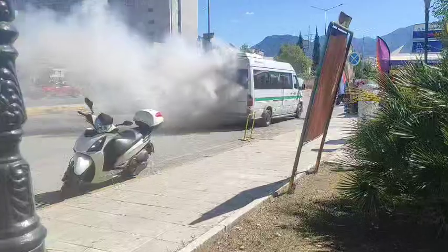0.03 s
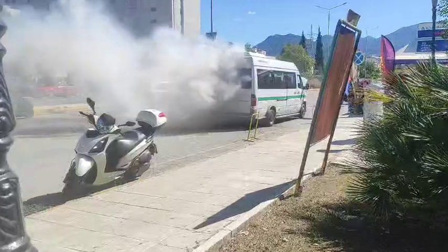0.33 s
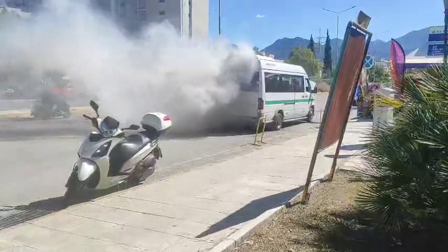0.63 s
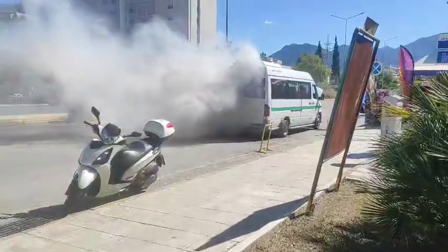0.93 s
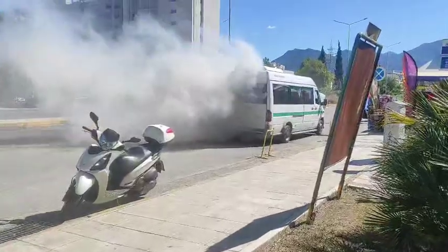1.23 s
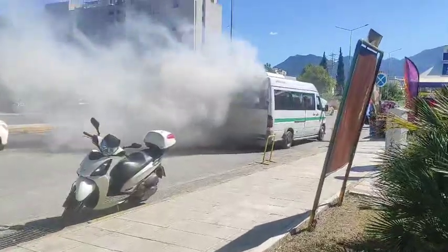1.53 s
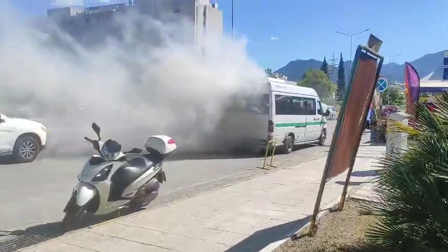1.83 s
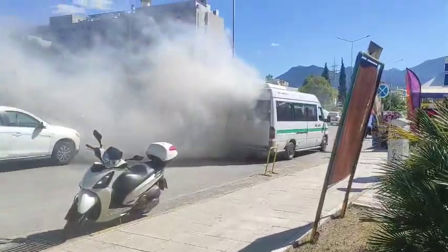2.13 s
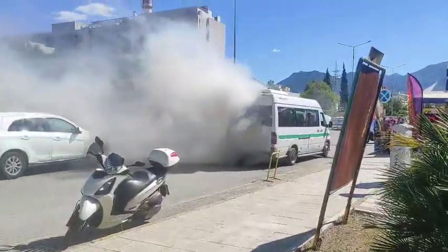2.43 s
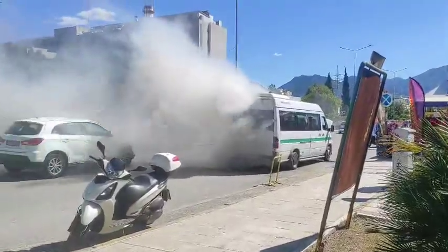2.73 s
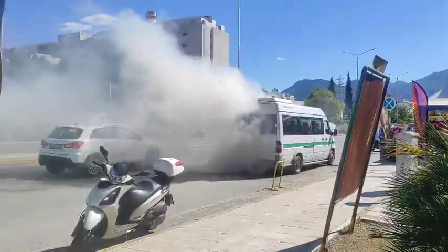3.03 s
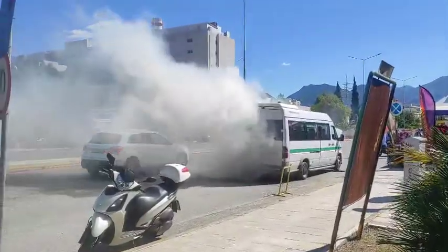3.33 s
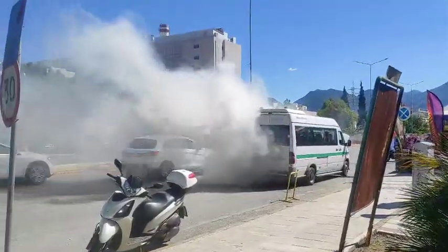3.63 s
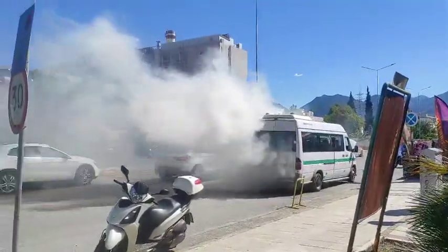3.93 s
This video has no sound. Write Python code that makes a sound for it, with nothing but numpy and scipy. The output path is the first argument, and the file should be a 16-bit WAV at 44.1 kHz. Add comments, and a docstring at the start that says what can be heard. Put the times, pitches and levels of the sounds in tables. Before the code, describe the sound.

Heard from the side of a street, a loud minibus engine races steadily, its exhaust throbbing under rattling metal, hiss and a thin whistle. Later it slows a little while a car rolls past in the background.

```python
"""At the kerb, a pair of microphones on a four-cylinder minibus engine, held at high revs and sagging
slowly. Its uneven firings throb in the exhaust and ring the engine block, with metallic squeals on
every cycle that merge into a thin whistle; the valve gear clatters and gas hisses in time with them.
Behind the engine, rumble and tyre noise swell as a car goes by."""
import sys
import numpy as np
from scipy import signal
from scipy.fft import rfft, irfft
from scipy.io import wavfile
from scipy.ndimage import map_coordinates

SR = 44100
rng = np.random.default_rng(int(sys.argv[2]) if len(sys.argv) > 2 else 0)


def digitize_waveform(pressure):
    """Quantize a signal to 16-bit integers and store it at the path in sys.argv[1].

    Rows of a 2-D input are taken as channels; values are limited to [-1, 1].
    """
    field = np.atleast_2d(pressure).T
    bounded = np.clip(field, -1, 1)
    quanta = np.round(bounded * 32767).astype(np.int16)
    wavfile.write(sys.argv[1], SR, quanta)


N = 176400
T = np.arange(N) / SR
HZ = np.maximum(np.arange(N // 2 + 1) * SR / N, 1e-3)

# Each row: frequency in Hz, share of the sound that reaches both microphones alike from 0 to 1.
MIC_LIKENESS = [(60, 0.98), (300, 0.89), (1000, 0.6), (1600, 0.83), (2400, 1), (4500, 0.2), (9000, 0)]
# Spectra at the microphones. Each row: frequency in Hz, left and right level in relative dB.
DEEP_SPECTRUM = [(12, -37, -17), (36.3, 2.5, -10), (60, -7, -5.5), (115, -3.5, -17.5)]
UPPER_SPECTRUM = [(94, -3.5, -30), (152.5, 4, 0.5), (275, 1, -3.5), (366, -12.5, -23), (574, -19, -13)]
TYRE_SPECTRUM = [(302, 5, 2), (445, 1.5, 2), (636, 5, -1), (810, 0.5, -7), (1500, -10, -24),
                 (3500, -26, -31), (5000, -12, -18), (6200, -10, -20)]
EXHAUST_SPECTRUM = [(25, -12, -13), (50, -5, -25), (118, 6, 2.5), (207, -4, -3), (296, 2, 0),
                    (410, -26, -26.5), (663, -1.5, 2.5)]
HISS_SPECTRUM = [(5380, -43, -33.5), (6810, -65, -10.5), (6640, -20, -13), (7320, -18.5, -11),
                 (7900, -15, -24), (8500, -12, -30), (9140, -12, -22.5), (9746, -24.5, -38),
                 (10100, -67, -53.5), (12100, -44, -41), (14600, -50, -51)]
CLATTER_SPECTRUM = [(355, -12, -17), (584, -13.5, -17), (770, -17, -22), (1180, -12.5, -11.5),
                    (1354, -12.5, -20.5), (1498, -6.5, 0.5), (1676, -5.5, -30), (1730, -16.5, -9.5),
                    (2040, -10.5, -13.5), (2370, -12.5, -15), (2650, -15, -8), (2736, -17.5, -22),
                    (3103, -19, -13), (3330, -60, -23), (3340, -16, -11.5), (4434, -20.5, -19),
                    (4170, -27.5, -28), (6000, -23, -19.5)]
# The street's swell. Each row: time in seconds, gain of the deep and of the upper rumble in dB.
RUMBLE_GAINS = [(.4, -3.5, -4.5), (.9, -5.5, -3), (1.25, -6.5, -0.5), (1.7, -2, -6.5), (2.05, -5, -3.5),
                (2.35, 1.5, -4.5), (2.55, -2.6, -8.5), (2.75, -2, 0.5), (2.9, -3.5, -3.5), (3.12, 4.5, 3.5),
                (3.25, 2, -1.5), (3.35, 4.5, 1), (3.55, 1, -0.5), (3.9, 0, -1)]
# The car drawing near. Each row: time in seconds, tyre level in dB.
TYRE_LEVELS = [(0, -59), (1.3, -49), (2.4, -42), (3.3, -42.5), (4, -40)]
# The sagging revs. Each row: time in seconds, engine cycles per second (four firings each).
ENGINE_SPEED = [(0.2, 27.62), (0.7, 27.48), (1.05, 27.49), (1.35, 27.52), (1.8, 27.35), (2.3, 27.18),
                (2.8, 26.83), (3.3, 26.47), (3.9, 25.97)]
# The uneven firings. Each row: one cylinder's place in the cycle from 0 to 1, then its strength in
# relative dB for exhaust, knock, lower ring, clatter, hiss, ping and clank.
CYLINDERS = [(0.061, -1.5, -9, 5, 8.5, 21, 4, -41), (0.319, 1, -5.5, -41, -0.5, 22, -11, 1.5),
             (0.552, -1, -42, 1, 5, 25.5, -1, 4), (0.661, -13, 0, -38, -0.5, -11, -26, -4.5)]
# The engine's shifting balance. Each row: time in seconds, gain of knock, clatter and hiss in dB.
ENGINE_GAINS = [(0.4, -4.5, 3, 0.3), (0.85, 1.5, 2, 3), (1.3, 6, 2.5, 0), (1.6, 3, 0.8, 0.7),
                (2.0, -2, 0.3, -0.5), (2.35, -3, 1, 1), (2.7, -3, -0.6, -2.5), (3.1, -10, 0.1, 0.1),
                (3.45, -9, 1.4, -1.9), (3.85, -6, 2.5, 0.4)]
# The block's resonances. Each row: frequency in Hz, width in Hz, level in relative dB.
LOWER_RING_MODES = [(602, 24, -15.5), (957, 32, 0), (1175, 35, -12), (1320, 22, -10)]
KNOCK_MODES = [(1430, 28, -2), (1597, 26, 0), (1720, 80, -6), (1812, 30, -5)]
CLANK_MODES = [(2000, 52, 0.34), (2236, 20, -2.4)]
PING_MODES = [(2635, 40, 0), (2747, 24, -4), (3140, 70, -2), (3460, 44, -8)]
# The block's lower ring. Each row: time in seconds, level in dB.
LOWER_RING_LEVELS = [(.25, -41.5), (.6, -38), (1.0, -40.5), (1.4, -38.5), (1.8, -37), (2.3, -40.5),
                     (2.7, -47.5), (3.1, -42), (3.5, -41.5), (3.9, -43.5)]
# The block's upper rings. Each row: time in seconds, gain of the ping and of the clank in dB.
UPPER_RING_GAINS = [(.4, -5.5, -10), (.9, 1.5, -10), (1.3, -12, -6), (1.8, -4, 3), (2.3, -2.5, -8),
                    (2.8, -10, -5), (3.3, -8, 6.5), (3.85, -7, -4)]
# Whistling overtones. Each row: multiple of the cycle rate, loudest place in the cycle from 0 to 1.
WHISTLES = [(58, .75), (60, .75)]
# One whistle gives way to the other. Each row: time in seconds, level of each whistle in dB.
WHISTLE_LEVELS = [(.3, -45, -60), (.75, -40.5, -60), (1.3, -38.5, -60), (1.8, -39, -60), (2.3, -37, -56),
                  (2.7, -39, -52), (3.0, -43, -47), (3.3, -52, -46), (3.85, -52, -44)]
# Once-a-cycle squeals. Each row: place in the cycle from 0 to 1, pitch at the peak in Hz,
# glide at full depth in Hz per second, half length in seconds.
SQUEALS = [(.75, 1565, -16000, .0045), (.13, 2680, 16000, .0026), (.64, 2660, 18000, .0026),
           (.15, 3450, 0, .004), (.37, 2060, -15000, .002), (.69, 2130, 0, .002), (.57, 1670, 0, .0025)]
# The squeals' balance. Each row: time in seconds, level of each squeal in dB.
SQUEAL_LEVELS = [(.35, -39.5, -50, -48, -43, -56, -56, -53), (.6, -38.5, -46, -46, -48, -56, -54, -51),
                 (.9, -38, -42.5, -42, -60, -54, -52, -48), (1.3, -38, -46, -50, -60, -54, -48, -47),
                 (1.8, -38.5, -54, -56, -53, -47, -47, -46), (2.35, -42.5, -55, -47, -54, -42.5, -44, -43),
                 (2.85, -45, -55, -45, -56, -44, -43, -46), (3.3, -47, -56, -48, -58, -48, -41.5, -50),
                 (3.85, -46, -58, -54, -58, -48, -44, -53)]
# The glides flatten as the revs sag. Each row: time in seconds, depth from 0 to 1.
GLIDE_DEPTH = [(1.2, .85), (1.9, .65), (2.5, .35)]

DEEP_DB, UPPER_DB, HISS_DB, CLATTER_DB = -37, -36, -35.5, -32.5  # before the gain tables
KNOCK_DB, PING_DB, CLANK_DB = -42, -43.5, -53  # likewise
EXHAUST_DB, FIRING_TONE_DB = -43.5, -46
TIMING_JITTER_S, STRENGTH_JITTER_DB, SQUEAL_SCATTER_DB = .00003, 1.9, 1.4
RIGHT_MIC_LAG_S = .00009


def undb(db):
    return 10 ** (np.asarray(db) / 20)


def level(x, db=0):
    return x * undb(db) / np.sqrt(np.mean(x ** 2))


def curve(table, column=1):
    """One column of a time table at every sample."""
    table = np.array(table)
    return np.interp(T, table[:, 0], table[:, column])


def pan(x, left_db):
    """Places a sound so that it is left_db louder at the left microphone."""
    return x * undb(np.array([[left_db], [-left_db]]) / 2)


def colour(pair, spectrum):
    """Mixes two unrelated signals into left and right and gives each its spectrum, with steep skirts."""
    spectrum, likeness = np.array(spectrum), np.array(MIC_LIKENESS)
    alike = np.clip(np.interp(np.log(HZ), np.log(likeness[:, 0]), likeness[:, 1]), 0, 1)
    mid, side = rfft(pair[0]) * np.sqrt(1 + alike), rfft(pair[1]) * np.sqrt(1 - alike)
    skirts = 1 / np.sqrt((1 + (spectrum[0, 0] / HZ) ** 8) * (1 + (HZ / spectrum[-1, 0]) ** 16))
    gains = [undb(np.interp(np.log(HZ), np.log(spectrum[:, 0]), spectrum[:, c])) * skirts for c in (1, 2)]
    return level(irfft(np.array([mid + side, mid - side]) * gains, N))


def rumble():
    """Low turbulent noise of exhaust flow and traffic, behind everything else."""
    deep = colour(rng.standard_normal((2, N)), DEEP_SPECTRUM)
    upper = colour(rng.standard_normal((2, N)), UPPER_SPECTRUM)
    deep *= undb(DEEP_DB + curve(RUMBLE_GAINS, column=1))
    upper *= undb(UPPER_DB + curve(RUMBLE_GAINS, column=2))
    return deep + upper


def tyres():
    """Road noise of a car drawing alongside the microphones."""
    return colour(rng.standard_normal((2, N)), TYRE_SPECTRUM) * undb(curve(TYRE_LEVELS))


def firings(cycle, column, jitter_s=TIMING_JITTER_S):
    """One pulse per cylinder and cycle, each a little different in time and strength."""
    pulses, turns = np.zeros(N + 2), np.arange(int(cycle[-1]) + 1)
    for cylinder in CYLINDERS:
        chance = rng.standard_normal((200, 2))[:len(turns)]
        due = turns + cylinder[0]
        at = np.clip((np.interp(due, cycle, T) + jitter_s * chance[:, 0]) * SR, 0, N)
        strength = undb(cylinder[column] + STRENGTH_JITTER_DB * chance[:, 1]) * (due < cycle[-1])
        np.add.at(pulses, at.astype(int), strength * (1 - at % 1))  # shared between two samples
        np.add.at(pulses, at.astype(int) + 1, strength * (at % 1))
    return pulses[:N]


def bursts(pulses, decay_s, steady):
    """An envelope that jumps at each pulse and dies away over a steady part."""
    pole = np.exp(-1 / (SR * decay_s))
    tails = level(signal.lfilter([1], [1, -pole], pulses))
    return np.sqrt(tails ** 2 + steady ** 2)


def rattle(cycle, repeat):
    """Two channels of noise like dense tiny impacts; the share `repeat` comes back on every cycle."""
    points = 1600
    patterns, fresh = rng.standard_normal((2, points)), rng.standard_normal((2, N))
    locked = np.array([map_coordinates(p, [cycle % 1 * points], mode="grid-wrap") for p in patterns])
    return np.sqrt(repeat) * locked + np.sqrt(1 - repeat) * fresh


def exhaust(cycle):
    """Rough puffs from the pipe over a tone at the firing rate."""
    puffs = rattle(cycle, repeat=0.34) * bursts(firings(cycle, column=1), decay_s=0.00083, steady=0.95)
    tone = level(np.sin(2 * np.pi * len(CYLINDERS) * cycle), FIRING_TONE_DB)
    return colour(puffs, EXHAUST_SPECTRUM) * undb(EXHAUST_DB) + pan(tone, left_db=4)


def hiss(cycle):
    """Sharp spits of gas in time with the firings."""
    gas = rattle(cycle, repeat=0.22)
    spits = bursts(firings(cycle, column=5, jitter_s=0.00034), decay_s=0.027, steady=0.49)
    return colour(gas * spits, HISS_SPECTRUM) * undb(HISS_DB + curve(ENGINE_GAINS, column=3))


def clatter(cycle):
    """Valve gear and combustion rattle, in bursts at the firings."""
    impacts = rattle(cycle, repeat=0.7)
    surges = bursts(firings(cycle, column=4, jitter_s=0.00029), decay_s=0.038, steady=0.57)
    return colour(impacts * surges, CLATTER_SPECTRUM) * undb(CLATTER_DB + curve(ENGINE_GAINS, column=2))


def ring(x, modes, rise_s):
    """Damped modes struck by x, with a rounded attack; neighbours swing in opposite senses."""
    response = 0
    for k, (hz, width, db) in enumerate(modes):
        detune = 1j * (HZ / hz - hz / HZ) * hz
        response += (-1) ** k * undb(db) / (1 + detune / width) / (1 + detune * np.pi * rise_s)
    return irfft(rfft(x) * response, N)


def struck_metal(cycle, modes, column, rough, rattle_s, rise_s):
    """Each firing strikes the metal, whose modes take a moment to build up; a short rattle follows."""
    blows = firings(cycle, column)
    after_rattle = bursts(blows, rattle_s, steady=0) * rng.standard_normal((2, N))
    return level(level(ring(blows, modes, rise_s)) + rough * level(ring(after_rattle, modes, rise_s)))


def engine_block(cycle):
    """The block's knock, lower ring, bright ping and clank, each struck hardest by its own cylinder."""
    knock = struck_metal(cycle, KNOCK_MODES, column=2, rough=0.8, rattle_s=0.015, rise_s=0.0011)
    lower = struck_metal(cycle, LOWER_RING_MODES, column=3, rough=0.7, rattle_s=0.02, rise_s=0.003)
    ping = struck_metal(cycle, PING_MODES, column=6, rough=0.38, rattle_s=0.005, rise_s=0.0015)
    clank = struck_metal(cycle, CLANK_MODES, column=7, rough=0.18, rattle_s=0.0093, rise_s=0.002)
    knock *= undb(KNOCK_DB + curve(ENGINE_GAINS, column=1))
    lower *= undb(curve(LOWER_RING_LEVELS))
    ping *= undb(PING_DB + curve(UPPER_RING_GAINS, column=1))
    clank *= undb(CLANK_DB + curve(UPPER_RING_GAINS, column=2))
    return pan(knock + lower, left_db=4) + pan(ping + clank, left_db=11.5)


def whistle(cycle):
    """A thin, softly throbbing whistle on an engine overtone; a higher one takes over as the revs sag."""
    out = 0
    for column, (multiple, place) in enumerate(WHISTLES, start=1):
        angle = 2 * np.pi * (cycle - place)
        throb = 1 + .25 * np.cos(angle)
        out += level(throb * np.cos(multiple * angle)) * undb(curve(WHISTLE_LEVELS, column))
    return pan(out, left_db=4)


def squeals(cycle):
    """Short metallic squeals, some gliding, each swelling and fading at its own place in the cycle."""
    out, speed, depth = 0, curve(ENGINE_SPEED), curve(GLIDE_DEPTH)
    for column, (place, hz, glide, half_s) in enumerate(SQUEALS, start=1):
        turn = np.round(cycle - place)
        chance = rng.standard_normal((200, 2))[turn.astype(int) + 1]
        from_peak_s = (cycle - place - turn) / speed + TIMING_JITTER_S * chance[:, 0]
        swell = np.exp(-(from_peak_s / half_s) ** 2 / 2) * undb(SQUEAL_SCATTER_DB * chance[:, 1])
        chirp = np.cos(2 * np.pi * (hz + glide * depth * from_peak_s / 2) * from_peak_s)
        out += level(swell * chirp) * undb(curve(SQUEAL_LEVELS, column))
    return pan(out, left_db=3)


def scene():
    """Everything in the engine follows one crankshaft; the sound reaches the left microphone first."""
    cycle = np.cumsum(curve(ENGINE_SPEED)) / SR  # engine cycles completed
    metal = squeals(cycle) + whistle(cycle) + engine_block(cycle) + clatter(cycle)
    left, right = metal + hiss(cycle) + exhaust(cycle) + rumble() + tyres()
    late_right = irfft(rfft(right) * np.exp(-2j * np.pi * HZ * RIGHT_MIC_LAG_S), N)
    return np.array([left, late_right])


def record(dry):
    """The phone opens its microphones with a short fade and cuts the top."""
    open_s, open_gain, full_ramp_s, top_hz = 0.069, 0.14, 0.28, 14500
    fade = np.where(T < open_s, 0, np.clip(open_gain + (T - open_s) / full_ramp_s, 0, 1))
    return signal.sosfilt(signal.ellip(8, .2, 70, top_hz, fs=SR, output="sos"), dry * fade)


dry = scene()
out = record(dry)
digitize_waveform(out)
```